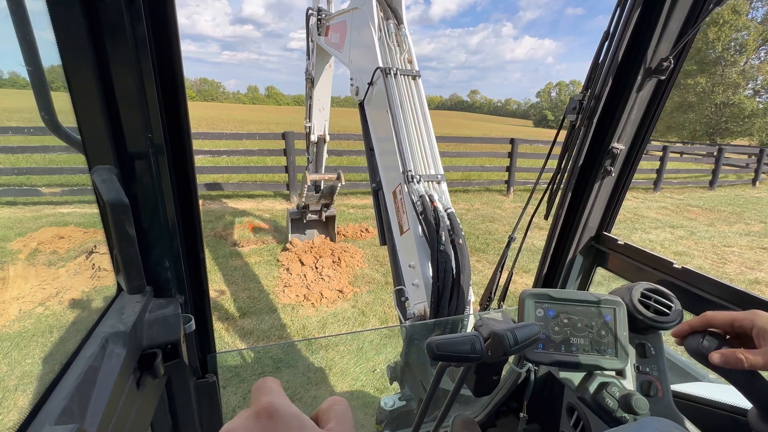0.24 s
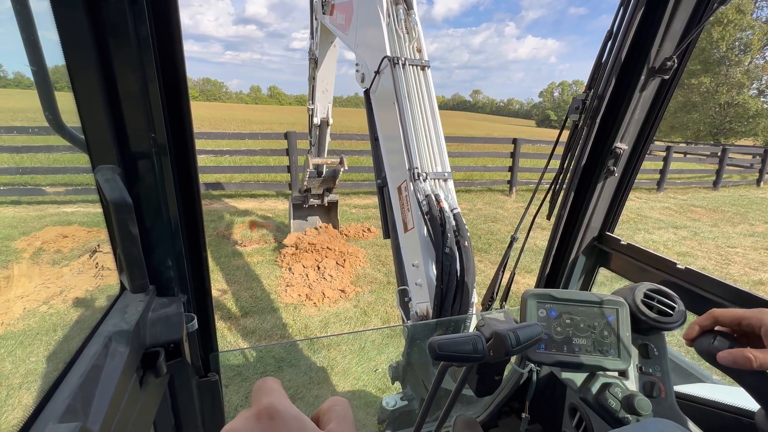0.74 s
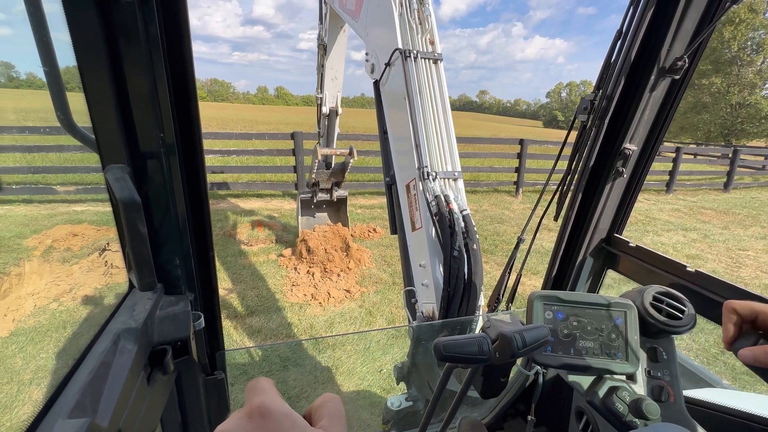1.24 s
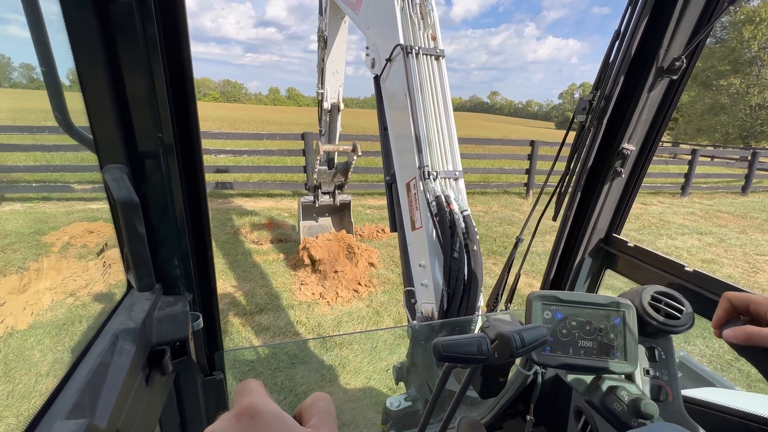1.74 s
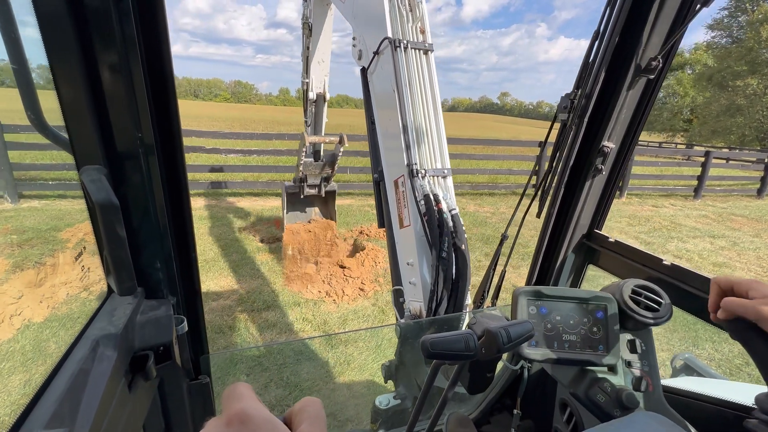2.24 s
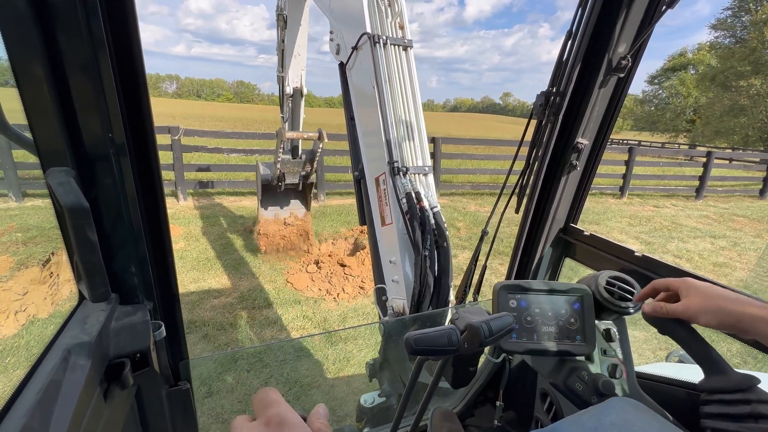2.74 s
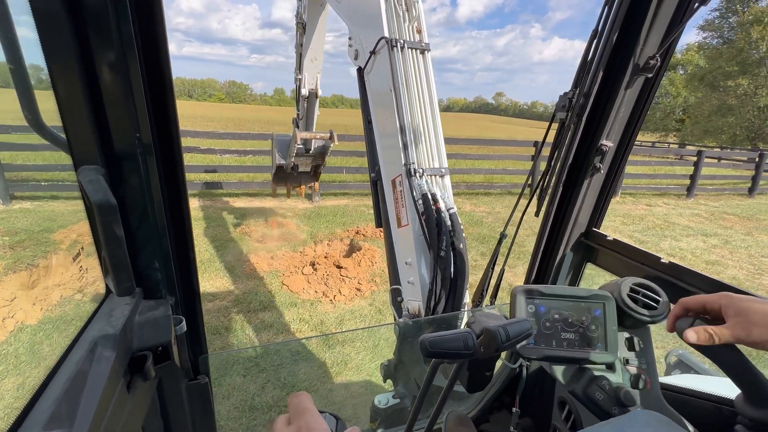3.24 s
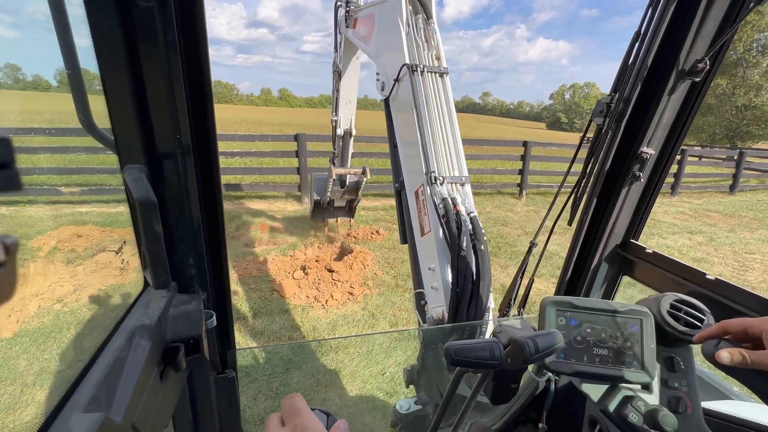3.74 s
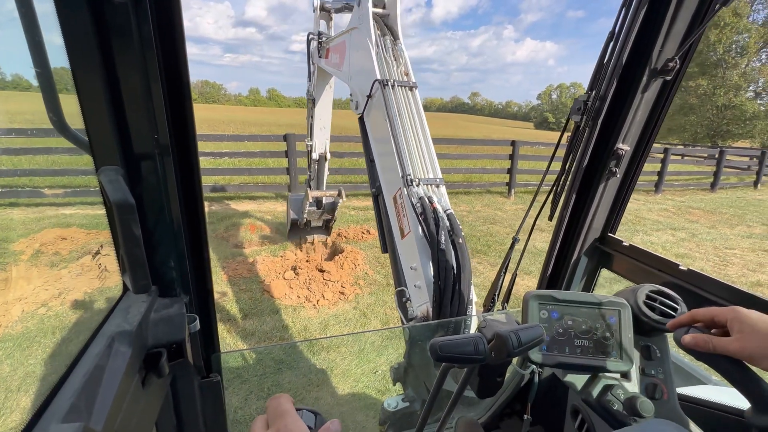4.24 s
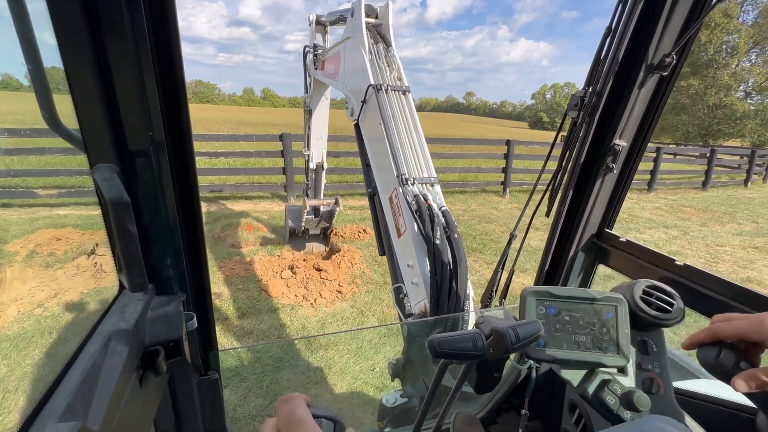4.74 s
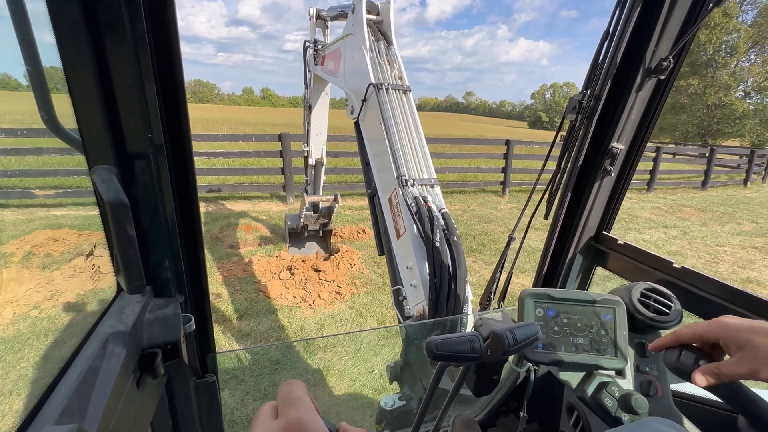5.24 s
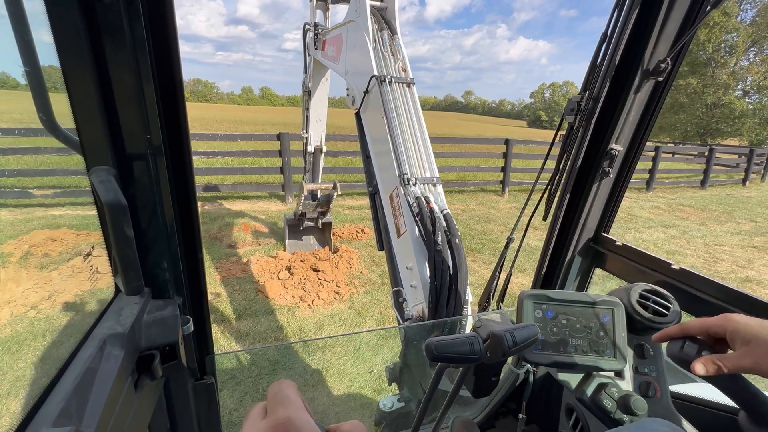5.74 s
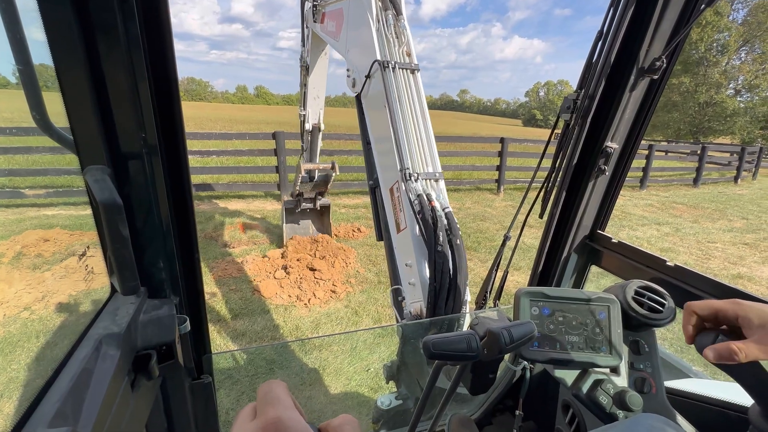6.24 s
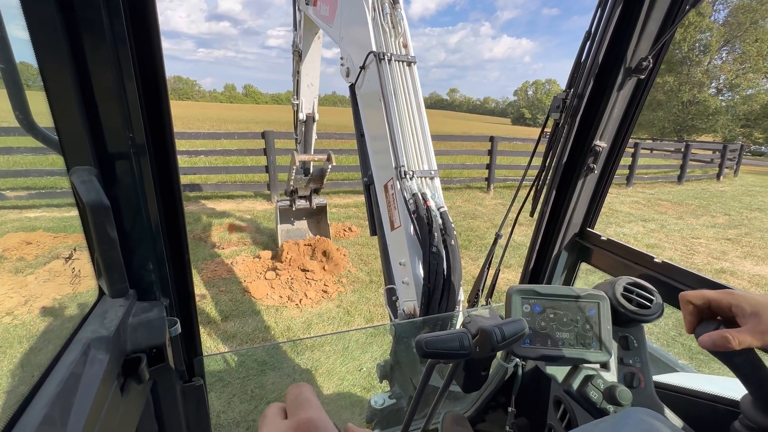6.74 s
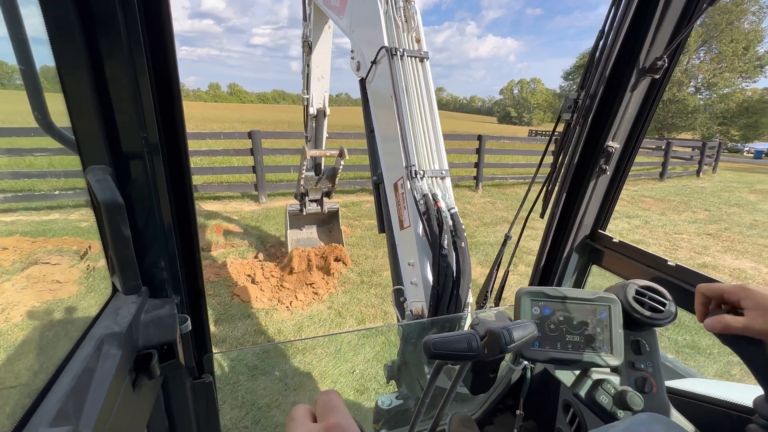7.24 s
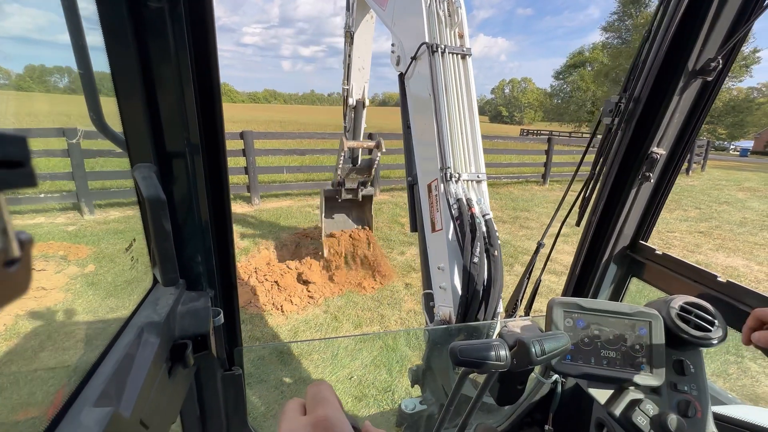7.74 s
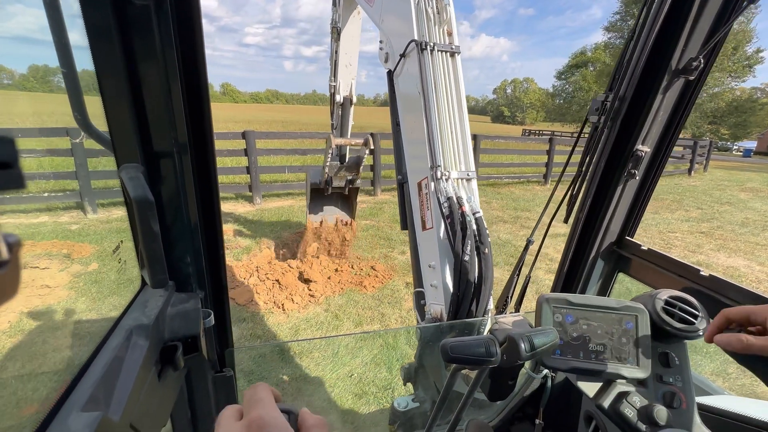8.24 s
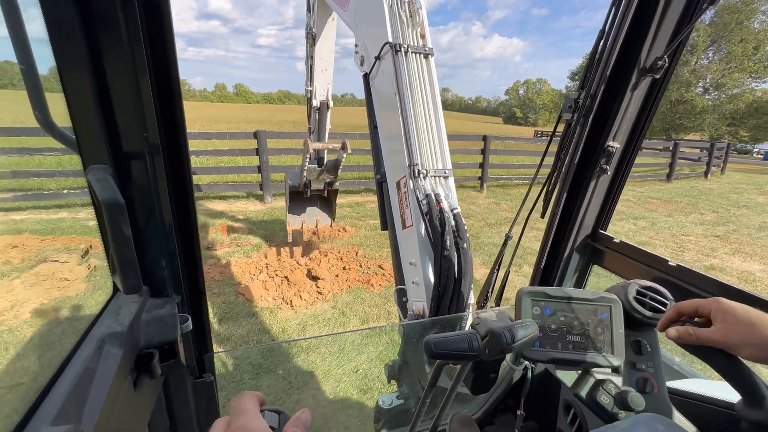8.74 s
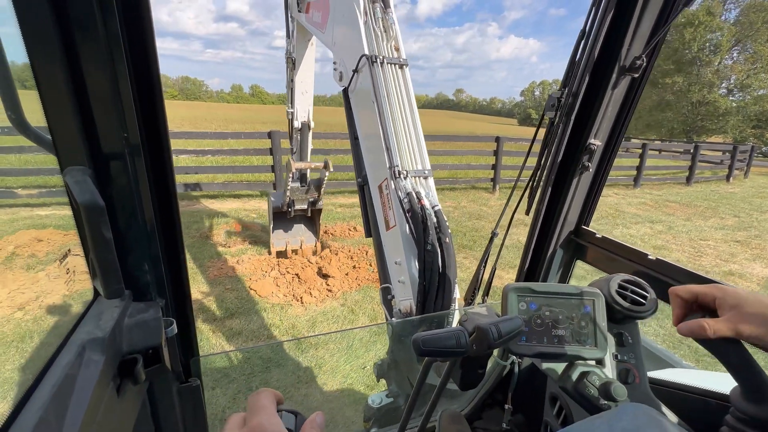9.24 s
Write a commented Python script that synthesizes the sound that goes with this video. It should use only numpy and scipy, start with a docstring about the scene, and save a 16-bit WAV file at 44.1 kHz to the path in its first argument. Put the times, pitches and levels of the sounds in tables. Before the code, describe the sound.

A deep, nearly constant engine drone fills a small digging machine's cab, layered with fan tone, swelling hydraulic hum and muffled air noise. Faint thin whistles come early. Then the bucket's loose joints rattle and clank in quick bursts, the cab thudding on its rubber mounts; a sharp crack follows later, then smaller clinks and wobbles toward the end. Stereo, from the operator's position inside.

```python
"""Inside the cab of a small excavator

A four-cylinder diesel booms at its firing rate as its speed sags and overshoots. Fan, nine-piston pump
and crankshaft orders are sines locked to the same shaft phase, over filtered noise for the rush of air.
Slack in the bucket linkage knocks: noise bursts and a first contact excite decaying modes of the steel.
Jolts raise a band of rumbling noise and set the cab ringing low on its mounts. Resonant noise gives brief
thin high tones: swelling whistles near 4 kHz, probably of the pump, and hissier chirps."""
import sys
import numpy as np
from scipy import signal
from scipy.fft import rfft, irfft, next_fast_len
from scipy.io import wavfile
from scipy.ndimage import uniform_filter1d

SR = 44100
rng = np.random.default_rng(int(sys.argv[2]) if len(sys.argv) > 2 else 0)


def wav_record(signal):
    """Record a signal, one row per channel, as 16-bit PCM in the file named by sys.argv[1]."""
    frames = np.transpose(np.atleast_2d(signal))
    bounded = np.clip(frames, -1, 1)
    # unit amplitude maps onto the largest positive 16-bit level
    quanta = np.round(bounded * 32767).astype(np.int16)
    wavfile.write(sys.argv[1], SR, quanta)


N = 418950   # length in samples

# shaft speed, sagging when the arm takes load and overshooting on release: t/s, f/Hz
SHAFT_SPEED = [(0.0, 35.8), (0.45, 33.86), (0.9, 34.3), (1.55, 33.95), (1.82, 34.96), (2.26, 32.93),
               (2.75, 34.57), (2.95, 33.9), (3.06, 32.7), (3.41, 36.07), (3.88, 33.44), (4.16, 34.25),
               (4.46, 32.2), (4.72, 34.74), (4.96, 32.49), (5.8, 34.95), (6.47, 33.49), (6.66, 34.32),
               (7.0, 33.83), (7.18, 32.49), (7.45, 35.65), (7.86, 33.42), (8.02, 35.11), (8.2, 33.83),
               (8.4, 34.73), (8.7, 33.76), (9.0, 35.2), (9.5, 33.57)]
FIRINGS_PER_TURN, PISTONS_PER_TURN = 2, 9
# the cab resonates just under the firing rate; the boom level follows the speed after a lag
BOOM_PEAK_DB, BOOM_HZ, BOOM_HALF_WIDTH_HZ, BOOM_LAG_S = -13, 66.07, 2.27, 0.04
# fan blades passing: cycles per turn, left level/dB, right level/dB, waver/dB, right-ear lag/cycles
FAN_TONES = [(8.42, -33.5, -24.5, 0.5, 0.017), (16.84, -35.5, -34.5, 3.5, 0.538)]
FAN_REFERENCE_HZ, FAN_DB_PER_HZ = 34.1, 1   # the fan is louder the faster the shaft turns
# weaker orders of the crankshaft: cycles per turn, left level/dB, right level/dB
CRANK_ORDERS = [(4.5, -39.5, -43.5), (5, -43.5, -47.5), (6, -38, -39.5), (7, -40, -43.5),
                (26, -46.5, -45.5)]
# pump hum swelling while a valve is open: start t/s, time to start of fall/s, level/dB
PUMP_SURGES = [(.38, 0.8, -33.5), (1.4, 0.79, -33), (2.3, 0.28, -30.5), (2.6, 0.38, -24.5),
               (4.22, 0.27, -30.5), (4.95, 0.88, -31), (6.05, .4, -35), (6.65, 0.34, -31),
               (7.53, 0.28, -27.5), (8.05, 0.18, -26), (8.4, 0.2223, -28)]
PUMP_IDLE_DB, PUMP_EDGE_S = -39, 0.051
# oil pressure, heard as pump whine: t/s, level/dB
WHINE_LEVEL = [(0, -50), (1.0, -55), (1.5, -50), (2.25, -47), (2.75, -47), (3.1, -45), (3.45, -45.5),
               (4.0, -52.5), (4.7, -49), (5.3, -50), (5.5, -47), (5.78, -48), (5.86, -44), (6.15, -51),
               (6.8, -47.5), (7.6, -49), (8.1, -46.5), (9.5, -59)]
# harmonics of the piston ripple: harmonic number, left and right level/dB above the whine level
WHINE_HARMONICS = [(2, 7.5, 10), (3, -1, 3.5), (4, -17, 3), (5, -3.5, 5.5), (6, -7, 3.5), (7, 2.5, 2),
                   (9, -5, -6)]
HOSE_HZ, HOSE_WIDTH_HZ, HOSE_DB = 649.5, 22, 7   # a pipe resonance lifts harmonics that reach it
# linkage knocks: t/s, rattle decay time/s, clatter gain/dB, low clunk and bright crack gain/dB above it,
# f/Hz of the most strongly excited ring
KNOCKS = [(2.592, 0.019, -18, 5.5, -1, 870), (2.618, 0.016, -25, 4, 5, 1825),
          (3.06, 0.016, -18.5, 5, -2, 1825), (3.071, 0.032, -26.5, 14, -12, 1500),
          (3.246, .018, -24, -11, 2, 1500), (3.276, 0.019, -26, 5, -12, 1250),
          (3.321, 0.023, -19, 10, -19, 1825), (3.339, 0.017, -19, -12, -9, 1825),
          (3.346, 0.012, -19.5, -5, 1.5, 2290), (3.788, 0.014, -29, -4, 6.5, 3350),
          (4.566, 0.015, -23, -12, -5, 2290), (4.73, 0.06, -29.5, 7, -8, 1250),
          (4.836, 0.02, -19, -13, 0, 2290), (4.854, 0.017, -12, 0.5, 1, 3350),
          (7.329, 0.02, -24, 8, 1.5, 4280), (8.016, 0.034, -31.5, 18.5, -12, 1825),
          (8.212, .014, -23.5, 5, 4.5, 4280), (8.348, 0.022, -19, 4.5, -21, 2900),
          (8.411, 0.019, -24.5, -8, -19, 1500)]
# modes of bucket and arm: f/Hz, relative level/dB, t60/s
BUCKET_MODES = [(520, 8, 0.083), (870, 11, .05), (1250, 7, 0.048), (1500, 12.5, 0.025), (1825, 7, 0.041),
                (2290, -10.5, 0.037), (2900, -7, 0.086), (3350, 8, 0.0096), (4280, -4, 0.026),
                (5200, 2, 0.034)]
CONTACTS_PER_S = 2300   # mean rate within a rattle
STRIKE_DB = 18   # height of the first contact that sets the modes ringing
# top of a crack at the reference gain; dB of pitch per dB of gain
CRACK_TOP_HZ, CRACK_REFERENCE_DB, CRACK_BRIGHTENING = 5130, -22, 0.36
# brief thin whistles near 4 kHz, probably of the pump, and hissier chirps:
# t/s, f/Hz, length/s, gain/dB, t60/s
HIGH_TONES = [(0.396, 3990, 0.23, -46, 1.5), (0.63, 3980, 0.2, -51, 1.2), (0.878, 5250, 0.047, -47, .06),
              (1.545, 3990, 0.11, -47, 1.5), (1.67, 5200, 0.16, -51, .03), (7.15, 5200, 0.17, -47, 0.03),
              (7.194, 4210, 0.13, -46, 0.021), (7.89, 3993, 0.066, -47, 0.07)]
# jolts as the arm starts, stops or bites: start t/s, time to start of fall/s, shudder gain/dB, push gain/dB
JOLTS = [(2.61, 0.07, -19, -20), (3.06, 0.13, -19.5, -17), (3.31, 0.11, -18, -11), (3.449, 0.11, -26, -15),
         (4.338, .15, -23.5, -24), (4.552, .1, -21, -20), (4.807, 0.1, -15.5, -10), (6.971, .3, -27.5, -23),
         (7.474, .15, -27, -14), (7.928, .1, -23, -21), (8.02, 0.15, -21.5, -17), (8.238, 0.11, -26, -22),
         (8.355, 0.1, -25, -26)]
ROCKING_DB, JOLT_EDGE_S = -34.5, 0.045   # shudder gain between jolts; rise and fall time
MOUNT_HZ, MOUNT_T60_S = 51.3, 0.47   # rubber mounts
TRIM_TICKS_PER_S, TRIM_DB = 2100, -22.5   # loose trim: mean tick rate, gain within the shudder
# spectrum of air and casing noise common to both ears: f/Hz, relative gain/dB
RUSH_MID = [(30, -62), (45, -20), (75, -8.5), (130, -27), (240, -22), (350, -25), (460, -21.5),
            (1100, -38.5), (1900, -39.5), (2500, -48.5), (5000, -55), (7800, -55.5), (9300, -71),
            (15000, -69.5)]
# spectrum of the noise opposed between the ears: f/Hz, relative gain/dB
RUSH_SIDE = [(30, -40), (60, -31.5), (130, -29.5), (190, -36.5), (330, -29), (420, -28.5), (640, -26.5),
             (730, -32.5), (920, -30.5), (1300, -37.5), (2400, -47.5), (5000, -55), (7500, -55),
             (9500, -71.5), (15000, -69.5)]
RUSH_DB = 14   # gain added to both spectra
# standing waves and panels of the cab: f/Hz, width/Hz, gain in common part/dB, gain in opposed part/dB
CAB_MODES = [(124, 13, 1, -2), (157, 49, 6, -7), (260.6, 17, -4, -1), (374, 13, -4.5, -11),
             (599, 57, -3.5, 6), (666, 82, 3.5, -3), (713.4, 58, -12.5, 1), (792, 19, -9.5, -5),
             (888, 89, 6.5, 1.5), (2004, 250, -4.5, -9.5)]
# narrow resonances of glass and trim, unlike at each ear: f/Hz, width/Hz, left gain/dB, right gain/dB
PANELS = [(240, 25, 4, 4), (418, 19, 2, 5), (460, 26, 0.5, -1), (759.5, 33, -4.5, 7.5), (851, 10, 2, 4),
          (1017, 62, 3.5, 6), (1117, 20, 6, -10), (1660, 40, -11, 1), (1702, 18, 2, 9.5),
          (1780, 19, 10.5, -4), (1849, 23, 9, 8.5), (2044, 23, 1.5, 8.5), (2090, 36, 8, 3),
          (3316, 21, 16.5, -10), (3600, 24, 3, -15), (3970, 63, 4, 6.5), (4350, 30, 9, 7.5),
          (5200, 86, -1, 7)]
# balance of the rush: f/Hz, left minus right/dB
RUSH_PAN = [(60, -2), (240, 1), (950, 1), (3770, -7.5), (15000, 0.5)]
CUTOFF_HZ = 16300   # upper limit of the sound


def amp(db):
    """Logarithmic level: decibels to amplitude ratio."""
    return 10 ** (np.asarray(db) / 20)


def rms_one(x):
    """Normalisation: scale to unit rms."""
    return x / np.sqrt(np.mean(x ** 2) + 1e-20)


def in_time(rows):
    """Linear interpolation: the columns of a time table at every sample."""
    s, *columns = np.transpose(rows)
    return [np.interp(np.arange(N) / SR, s, column) for column in columns]


def at_hz(points, hz):
    """Logarithmic frequency axis: interpolate a spectrum in dB."""
    table_hz, table_db = np.array(points).T
    return np.interp(np.log(hz + 1), np.log(table_hz), table_db)


def drift(rate_hz):
    """Low-pass random process: noise through two equal poles at rate_hz, scaled to unit spread."""
    step = 40   # computed at every 40th sample
    r = np.exp(-2 * np.pi * rate_hz * step / SR)
    noise = rng.standard_normal(N // step + 2002)
    slow = signal.lfilter([1], [1, -2 * r, r * r], noise)[2000:]   # the start-up is discarded
    return np.interp(np.arange(N) / step, np.arange(len(slow)), rms_one(slow - slow.mean()))


def swells(rows, rest_db, edge_s):
    """Trapezoidal envelope: a level in dB that rests, rises for each row, holds and falls back."""
    t, gain = np.arange(N) / SR, amp(rest_db)
    for start, length, level_db, *_ in rows:
        nearest_edge = np.minimum(t - start, start + length + edge_s - t)
        gain = np.maximum(gain, amp(level_db) * np.clip(nearest_edge / edge_s, 0, 1))
    return 20 * np.log10(gain)


def ring(x, hz, t60):
    """Damped oscillator: a unit click starts a decaying sine of initial height 1."""
    r, w = amp(-60 / (t60 * SR)), 2 * np.pi * hz / SR
    return signal.lfilter([0, np.sin(w)], [1, -2 * r * np.cos(w), r * r], x + 1e-18)


def band(x, low_hz, high_hz):
    """Band-pass filtering: keep the sound between two frequencies."""
    sos = signal.butter(2, [low_hz, min(high_hz, .45 * SR)], "band", fs=SR, output="sos")
    return signal.sosfilt(sos, x)


def tone(turns, multiple, left_db, right_db, lag):
    """Phase locking: a sine at a multiple of shaft phase, with its own level and phase at each ear."""
    cycles = multiple * turns + rng.random() - np.array([[0], [lag]])
    return np.sqrt(2) * amp([[left_db], [right_db]]) * np.sin(2 * np.pi * cycles)


def firing_boom(turns, shaft_hz):
    """Forced resonance: the boom grows as the firing rate nears a mode of the cab."""
    t = np.arange(N) / SR
    firing_hz = FIRINGS_PER_TURN * np.interp(t - BOOM_LAG_S, t, shaft_hz)
    detuning = (firing_hz - BOOM_HZ) / BOOM_HALF_WIDTH_HZ
    boom_db = BOOM_PEAK_DB - 10 * np.log10(1 + detuning ** 2) + 0.19 * drift(15.0)
    wobble = 0.035 * drift(4.3)   # uneven firing, in cycles
    boom = amp(boom_db) * np.sin(2 * np.pi * (FIRINGS_PER_TURN * turns + wobble))
    return np.sqrt(2) * boom * amp([[-.3], [.3]])


def pump_hum(turns):
    """Flow ripple: one pulse per piston makes a sine at nine times shaft speed."""
    hum_db = swells(PUMP_SURGES, PUMP_IDLE_DB, PUMP_EDGE_S) + 1.7 * drift(4.1)
    return np.sqrt(2) * amp(hum_db) * np.sin(2 * np.pi * PISTONS_PER_TURN * turns)


def pump_whine(turns, shaft_hz):
    """Harmonics of flow ripple: each wavers independently and is lifted near the pipe resonance."""
    out = np.zeros((2, N))
    whine_db, = in_time(WHINE_LEVEL)
    for harmonic, left_db, right_db in WHINE_HARMONICS:
        order = PISTONS_PER_TURN * harmonic
        hose_db = HOSE_DB * np.exp(-((order * shaft_hz - HOSE_HZ) / HOSE_WIDTH_HZ) ** 2)
        unsteady_turns = turns + 0.002 * drift(9.0)
        level = amp(whine_db + hose_db + 2.2 * drift(4.0))
        out += tone(unsteady_turns, order, left_db, right_db, 0.28) * level
    return out


def fan_blades(turns, shaft_hz):
    """Blade-passing tones: sines at fixed multiples of shaft speed, louder as it rises."""
    out = np.zeros((2, N))
    fan_db = FAN_DB_PER_HZ * (shaft_hz - FAN_REFERENCE_HZ)
    for multiple, left_db, right_db, waver_db, lag in FAN_TONES:
        out += tone(turns, multiple, left_db, right_db, lag) * amp(fan_db + waver_db * drift(4.0))
    return out


def crank_orders(turns):
    """Order excitation: weaker crankshaft vibrations at fixed multiples of its rotation."""
    out = np.zeros((2, N))
    for order, left_db, right_db in CRANK_ORDERS:
        out += tone(turns, order, left_db, right_db, 0.03) * amp(4.0 * drift(2.8))
    return out


def shaft_tones():
    """Common rotation: the integral of shaft speed sets the phase of every tone locked to the shaft."""
    shaft_hz = uniform_filter1d(in_time(SHAFT_SPEED)[0], size=3000)   # the flywheel rounds off changes
    turns = np.cumsum(shaft_hz) / SR
    driven = fan_blades(turns, shaft_hz) + crank_orders(turns) + pump_whine(turns, shaft_hz)
    return firing_boom(turns, shaft_hz) + pump_hum(turns) + driven


def bucket_rings(rattle, t, strongest_hz):
    """Modal excitation: the place of the blow favours one mode; others weaken per octave of distance."""
    struck = rattle + amp(STRIKE_DB) * (t == 0)
    out = 0
    for hz, level_db, t60 in BUCKET_MODES:
        octaves = abs(np.log2(hz / strongest_hz))
        out = out + amp(level_db - 30.0 - 30.0 * octaves) * ring(struck, hz, t60)
    return out


def knocks():
    """Impact excitation: short rattles of contacts give a clunk, a ringing clatter and a bright crack."""
    out, t = np.zeros((2, N)), np.arange(SR // 7) / SR
    for s, length, peak_db, low_db, bright_db, strongest_hz in KNOCKS:
        noise = rng.standard_normal((3, len(t)))
        contacts = rng.random(len(t)) < CONTACTS_PER_S / SR
        grit = noise[:2] * (0.7 + 0.6 * np.sqrt(SR / CONTACTS_PER_S) * contacts)
        # the slack closes contact by contact
        rattle = grit * (1 - np.exp(-t / 0.0043)) * np.exp(-(t / length) ** 2)
        rasp = band(band(rattle, 600, 3000), 600, 3000)   # twice, for steeper sides
        clatter = amp(6) * rasp + bucket_rings(rattle, t, strongest_hz)

        # harder is brighter
        hardness_db = peak_db + bright_db - CRACK_REFERENCE_DB
        top_hz = max(4500, CRACK_TOP_HZ * amp(CRACK_BRIGHTENING * hardness_db))
        crack_envelope = (1 - np.exp(-t / 0.00052)) * np.exp(-t / (0.67 * length))
        crack = amp(bright_db) * band(grit * crack_envelope, 4400, top_hz)

        bass = noise[2] + noise[:2]   # partly alike at both ears
        clunk_envelope = (1 - np.exp(-t / 0.0024)) * np.exp(-t / (0.86 * length))
        clunk = amp(low_db + 12.0) * band(bass * clunk_envelope, 214, 595)
        at = round(s * SR)
        out[:, at:at + len(t)] += amp(peak_db) * (clatter + crack + clunk) * amp([[-1.5], [1.5]])
    return out


def high_tones():
    """Resonant filtering: noise through a narrow resonance swells and fades; a longer t60 whistles purer."""
    out = np.zeros(N)
    for s, pitch_hz, length, level_db, t60 in HIGH_TONES:
        at, size = round(s * SR), round(length * SR)
        thin_noise = rms_one(ring(rng.standard_normal(SR), pitch_hz, t60)[-size:])
        out[at:at + size] += amp(level_db) * thin_noise * np.sqrt(np.hanning(size))
    return out * amp([[-3.], [3.]])


def bounces():
    """Mass on springs: each jolt gives a soft push and the cab rings low on its mounts."""
    pushes = np.zeros(N)
    for s, _, _, push_db in JOLTS:
        pushes[round(s * SR)] = amp(push_db)
    push = np.hanning(SR // 120)
    soft_pushes = signal.fftconvolve(pushes, push / push.sum())[:N]
    return band(ring(soft_pushes, MOUNT_HZ, MOUNT_T60_S), .75 * MOUNT_HZ, 1.3 * MOUNT_HZ)


def shudder():
    """Random vibration: the rocking cab gives narrow and wider low noise, and loose trim ticks at random."""
    rocking, rumble = rng.standard_normal((2, N))
    ticks = rng.standard_normal((2, N)) * (rng.random(N) < TRIM_TICKS_PER_S / SR)
    low = rms_one(band(rocking, 52.0, 73.7)) + amp(-2.5) * rms_one(band(rumble, 50.0, 285))
    trim = amp(TRIM_DB) * rms_one(band(ticks, 1200, 4200))
    return amp(swells(JOLTS, ROCKING_DB, JOLT_EDGE_S)) * (low + trim)


def rush():
    """Modal colouring of broadband noise: cab resonances shape the air rush; its treble flutters a little."""
    size = next_fast_len(N)
    hz = np.arange(size // 2 + 1) * SR / size
    mid_db, side_db = at_hz(RUSH_MID, hz), at_hz(RUSH_SIDE, hz)
    for centre_hz, width_hz, in_mid_db, in_side_db in CAB_MODES:
        bell = np.exp(-2 * ((hz - centre_hz) / width_hz) ** 2)
        mid_db, side_db = mid_db + in_mid_db * bell, side_db + in_side_db * bell
    mid, side = rfft(rng.standard_normal((2, size))) * amp([mid_db, side_db])

    panel_db = 0
    for centre_hz, width_hz, *ear_db in PANELS:
        bell = np.exp(-2 * ((hz - centre_hz) / width_hz) ** 2)
        panel_db = panel_db + np.outer(ear_db, bell)
    pan = amp(at_hz(RUSH_PAN, hz) / 2)
    ears = np.array([(mid + side) * pan, (mid - side) / pan]) * amp(panel_db)

    # many small reflections off glass and steel ripple the colour, unlike at each ear
    t = np.arange(SR // 8) / SR
    echoes = amp(-34) * rng.standard_normal((2, len(t))) * np.exp(-t / 0.012) * (t > .002)
    ears = ears * (1 + rfft(band(echoes, 1110, 8200), size))

    treble = hz ** 2 / (hz ** 2 + 1700.0 ** 2)
    low = irfft(ears * (1 - treble), size)[:, :N]
    high = irfft(ears * treble, size)[:, :N]
    return amp(RUSH_DB) * (low * amp(.5 * drift(4.0)) + high * amp(1.0 * drift(9.4)))


def scene():
    """Superposition: shaft tones, knocks, high tones, bounces, shudder and air rush add."""
    return shaft_tones() + knocks() + high_tones() + bounces() + shudder() + rush()


def record(dry):
    """Transducer limits: microphones drop the deepest bass and round off peaks; the top is cut."""
    bass_cut = signal.butter(2, 30.0, "high", fs=SR, output="sos")
    rounded = np.tanh(signal.sosfilt(bass_cut, dry) / 1.4) * 1.4
    top_cut = signal.cheby2(12, 70, CUTOFF_HZ, fs=SR, output="sos")
    return signal.sosfilt(top_cut, rounded)


dry = scene()
out = record(dry)
wav_record(out)
```